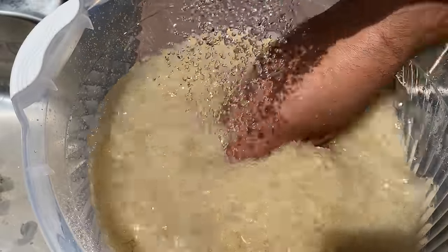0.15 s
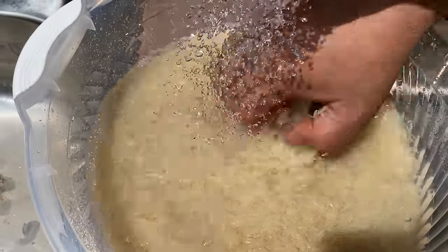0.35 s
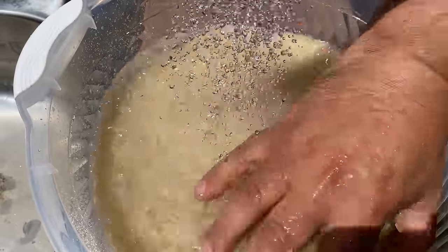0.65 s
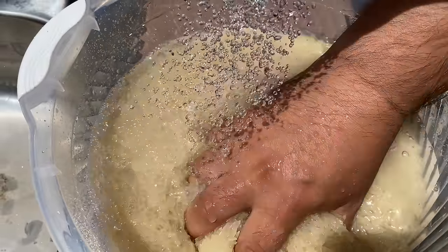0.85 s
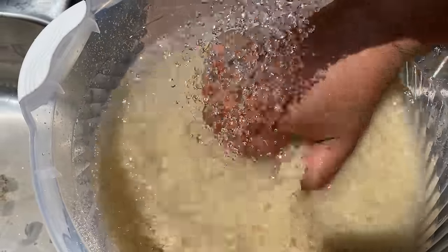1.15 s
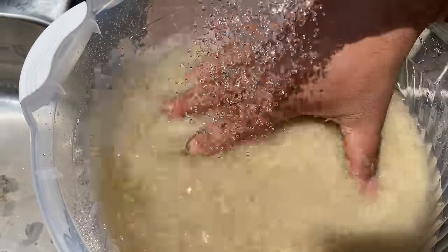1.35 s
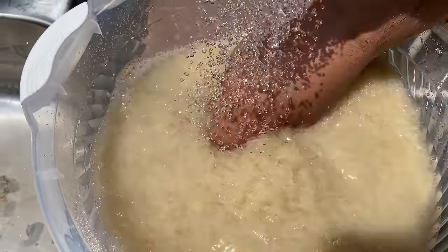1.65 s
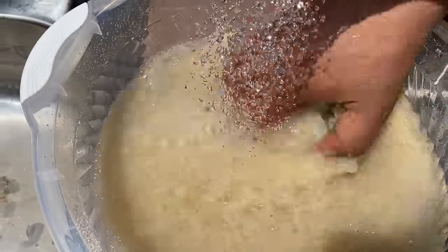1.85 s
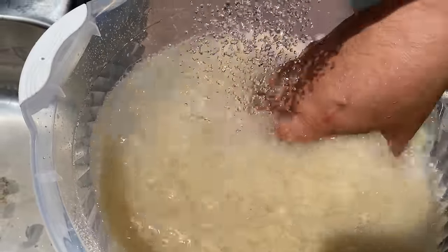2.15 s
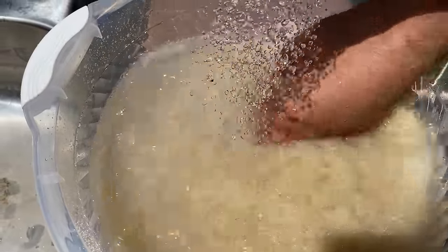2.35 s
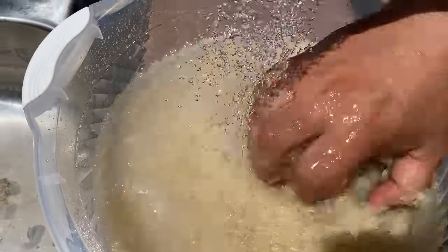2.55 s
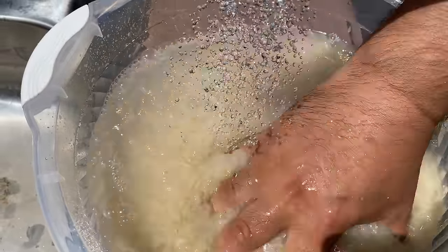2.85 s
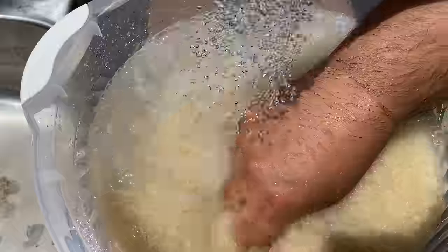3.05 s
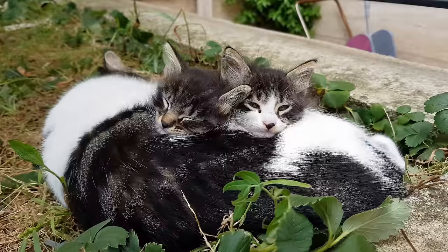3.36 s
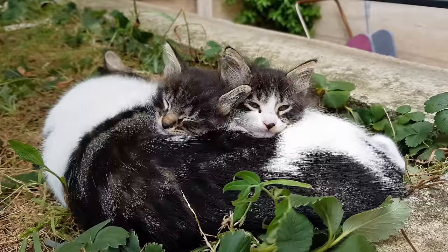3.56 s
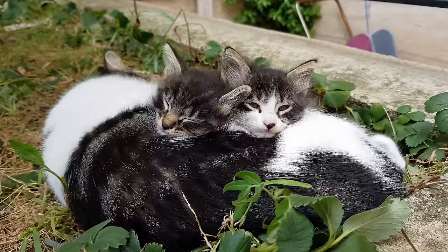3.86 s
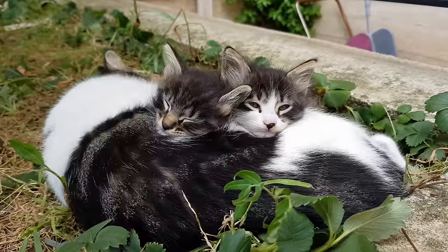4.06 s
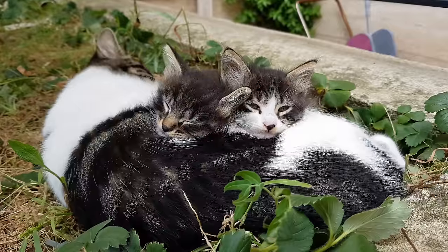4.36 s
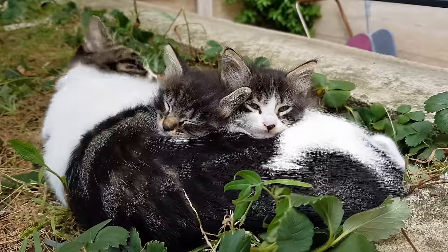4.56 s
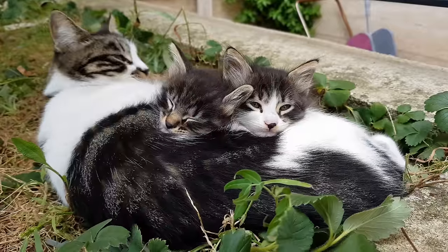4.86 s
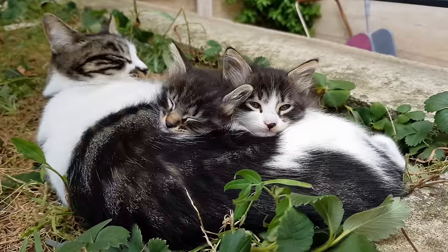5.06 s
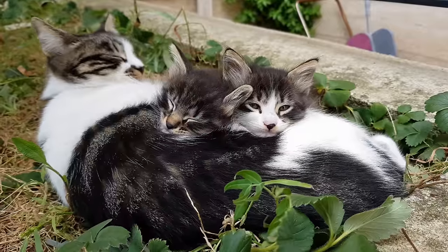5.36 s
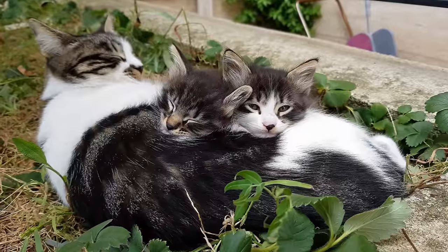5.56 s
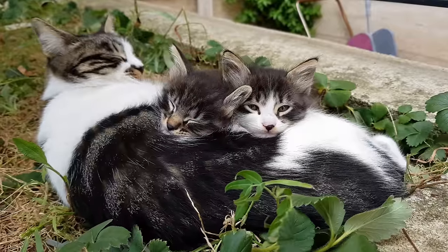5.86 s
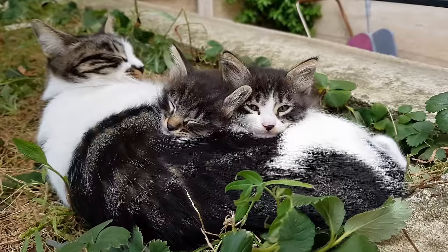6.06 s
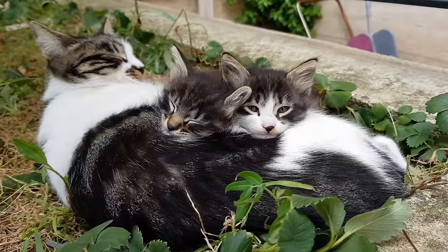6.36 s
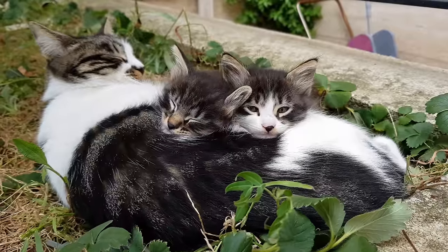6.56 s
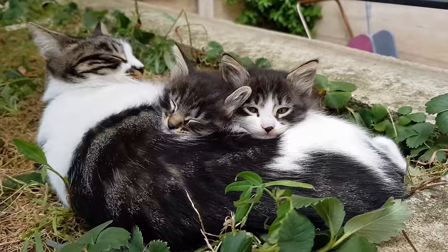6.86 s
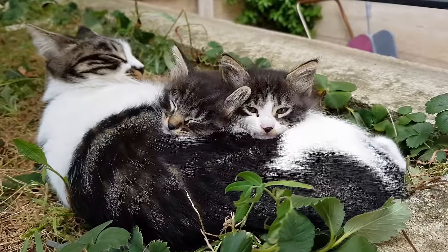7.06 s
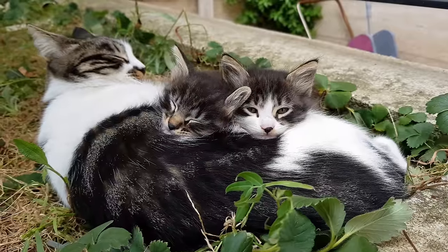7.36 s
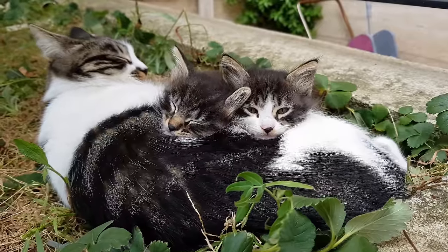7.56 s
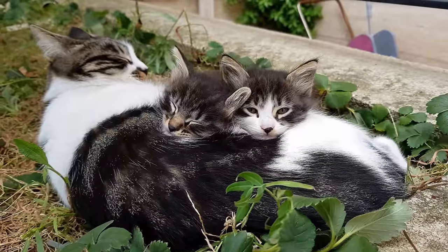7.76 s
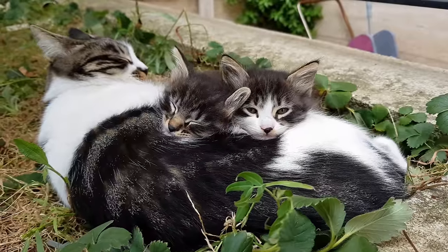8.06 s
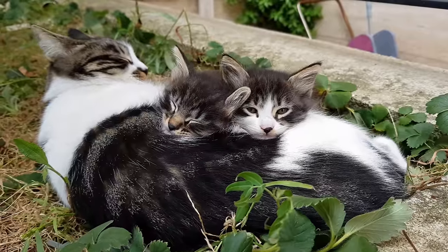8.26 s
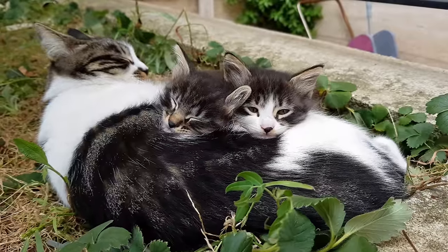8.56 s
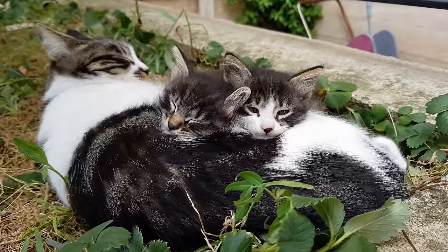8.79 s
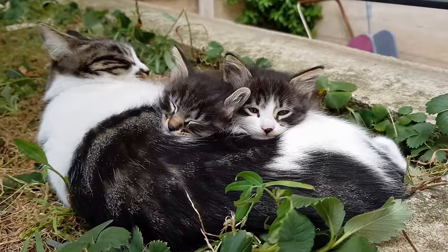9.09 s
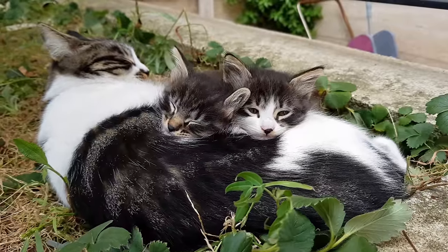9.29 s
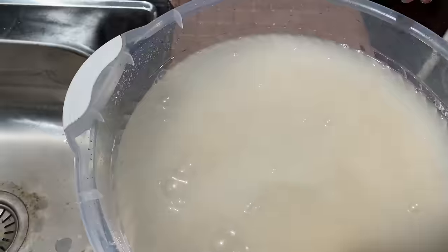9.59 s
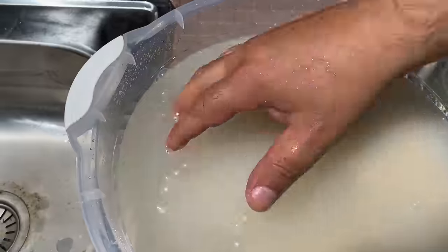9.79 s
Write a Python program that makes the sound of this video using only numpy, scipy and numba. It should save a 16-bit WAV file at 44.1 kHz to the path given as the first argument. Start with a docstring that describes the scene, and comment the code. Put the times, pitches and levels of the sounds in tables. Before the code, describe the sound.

Close, bright running water hisses, fizzes and burbles in a bowl as a hand rubs rice, then shuts off to faint wet ticks.

```python
"""Rinsing rice under a spray tap

A spray tap runs into a plastic bowl of rice and water, close up, while a hand stirs and rubs the grains.
Drops patter as clicks and ringing specks, small bubbles fizz as showers of damped sines,
and larger air pockets gurgle at a pitch that slides with each stroke of the hand.
The tap is shut near the end: a faint hiss, one drip and a few wet ticks remain over a low rumble of air."""
import sys
import numpy as np
from scipy import signal
from scipy.fft import rfft, irfft
from scipy.io import wavfile
from scipy.ndimage import uniform_filter1d
from numba import njit

SR = 44100
rng = np.random.default_rng(int(sys.argv[2]) if len(sys.argv) > 2 else 0)


def store_pcm(level_fs):
    """Save levels as 16-bit WAV."""
    pcm = np.round(np.clip(level_fs, -1, 1) * 32767).astype(np.int16)
    wavfile.write(sys.argv[1], SR, np.atleast_2d(pcm).T)


N = 437892
TIME = np.arange(N) / SR  # s

# tone of the spray: freq_hz, relative_db
SPRAY_TONE = [(400, -27.5), (800, -24), (1500, -10), (3000, 0), (4500, -0.5), (5800, 0.5), (7200, -1.5),
              (8800, 0.5), (9800, -2.5), (11000, -9), (13500, -10.5), (15800, -15)]


def spray(surge):
    """Drops slap skin and water as sharp clicks, and many trap a tiny, briefly ringing bubble."""
    s, size, sign, _ = shower(count=90000, scatter_db=6.7)
    clicks = np.bincount((s * SR).astype(int), size * np.sign(sign - .5), N)
    s, size, place, spread = shower(count=44000, scatter_db=6.0)
    hz = 3400 * 4.323 ** place
    cycles = 27 * np.exp(0.678 * spread)
    # smaller bubbles ring for less time but more strongly, so all sizes carry like energy
    fizz = ring(s, hz, cycles, size * np.sqrt(hz), rise=.05, swell=2.2)
    patter = colour(clicks, SPRAY_TONE) + undb(-1.5) * colour(fizz, SPRAY_TONE)
    return steady(patter * undb(2.0 * surge))


# typical pitch of the small bubbles, lower where the stream plunges deep: time_s, pitch_hz
CHURN_PITCH = [(0, 3200), (1.1, 2750), (2.6, 3000), (3.8, 2559), (5.3, 2439), (5.9, 3309), (6.6, 2909),
               (7.3, 2202), (8.8, 2259)]


def small_bubbles(surge):
    """Millimetre bubbles crackle where the stream and the fingers churn the rice."""
    s, size, _, spread = shower(count=40000, scatter_db=4.7)
    typical_hz = np.interp(s, *np.transpose(CHURN_PITCH))
    hz = np.minimum(typical_hz * np.exp(.35 * rng.standard_normal(len(s))), SR / 4)
    cycles = 30 * np.exp(0.74 * spread)
    crackle = ring(s, hz, cycles, size, rise=0.0328, swell=0.735)
    return steady(low_cut(crackle, 586) * undb(3.0 * surge))


POCKET_HZ = 902.5  # pitch of a pocket of ordinary size


def gurgle():
    """The air pocket under the stream rings at a gliding pitch; a large one is purer, with more overtone."""
    pitch = pocket_pitch() * np.exp(0.02 * walk(18))
    s, size, _, spread = shower(count=4200, scatter_db=4.5)
    centre = pitch[(s * SR).astype(int)]
    small = centre / POCKET_HZ  # above 1 for a small pocket
    hz = centre * np.exp(0.063 * small ** 1.2 * spread)
    cycles = np.full(len(s), 36.)
    pocket = ring(s, hz, cycles, size, rise=0.04, swell=1.2)
    overtone = ring(s, hz * 1.6, cycles * 1.74, size * undb(-18) / small ** 2, rise=0.037, swell=1.2)
    # fragments of the pocket ring near one pitch of their own
    s, size, _, spread = shower(count=4200, scatter_db=4.0)
    small = pitch[(s * SR).astype(int)] / POCKET_HZ
    hz = 975 * small ** .1 * np.exp(0.12 * spread)
    fragments = ring(s, hz, np.full(len(s), 33.), size / small ** 2.2, rise=0.028, swell=1.3)
    return steady(low_cut(pocket + overtone + undb(-1.5) * fragments, 400))


# strokes of the hand through rice and stream; levels before sag and trim, settling before its speed factor:
# start_s, length_s, settle_by_20_db_s, spray_db, churn_db, gurgle_db, first_pocket_hz, last_pocket_hz
STROKES = [(-.03, 0.304, 1.43, -28.5, -36.5, -35.5, 988, 853), (0.546, 0.31, 1, -31, -37, -37, 992.5, 939),
           (1.017, 0.44, 1.16, -35, -41, -46, 835, 1050), (1.459, 0.335, 0.01, -32.5, -47, -38, 943, 940.4),
           (1.766, 0.1414, 0.04, -30.5, -39, -36.5, 985, 902),
           (1.9, 0.552, 3.5, -30, -36.5, -34, 980, 1025), (2.59, 0.656, 0.08, -32.5, -39, -36.5, 955, 867),
           (3.347, 0.093, 0.72, -39.5, -46, -61.5, 1058, 1156),
           (3.474, 0.1183, 0.16, -33, -38.5, -36, 925, 926),
           (3.596, 0.1547, 1.11, -30.5, -37, -43, 796.4, 590.3),
           (3.834, 0.288, 2, -32, -37, -36, 931, 751.4), (4.295, 0.234, 0.29, -30, -36, -38, 978, 782),
           (4.596, 0.1963, 1.1, -29, -36.5, -40, 988, 440), (4.899, 0.169, 0.89, -33, -35.5, -36, 794, 960),
           (5.097, 0.313, 1.01, -31.5, -38, -42, 822, 505), (5.583, 0.157, 1.41, -33, -37, -41, 900, 841),
           (5.887, 0.2897, 0.19, -33, -44.5, -39.5, 1042, 660),
           (6.323, 0.328, 0.426, -31.5, -41, -42, 904.6, 427),
           (6.739, 0.235, 0.47, -37.5, -40.5, -44.5, 536.4, 819),
           (7.022, 0.133, 0.5, -35, -40, -43, 1004, 842), (7.217, 0.078, 0.3, -36.5, -39.5, -46, 771, 805),
           (7.411, 0.496, .5, -31, -35, -38.5, 870, 740),
           (7.86, 0.3904, 0.3, -32.5, -36, -37.5, 789, 511.6),
           (8.269, .55, 0.12, -32.5, -35.5, -39.5, 554, 615)]
# how each part of the water answers a stroke: attack_s, sag_db over the stroke, settling_speed factor, trim_db
SPRAY_SHAPE = (0.0245, -0.12, 1.284, -0.125)
CHURN_SHAPE = (0.0569, 0.816, 1.242, 0.45)
GURGLE_SHAPE = (0.0623, 2.06, 1.56, 1.04)


def stroke_gain(column, shape):
    """Each stroke swells, sags while the hand pushes, then settles; overlapping strokes add in power."""
    attack_s, sag_db, settling_speed, trim_db = shape
    power = np.zeros(N)
    for row in STROKES:
        start, length, settle_s = row[:3]
        first = max(int(start * SR), 0)
        age = TIME[first:first + 2 * SR] - start
        sag = sag_db * np.minimum(age / length, 1)
        settle = 20 * settling_speed * np.maximum(age - length, 0) / settle_s
        attack = np.clip(age / attack_s, 0, 1)
        power[first:first + len(age)] += (attack * undb(row[column] - sag - settle)) ** 2
    return np.sqrt(power) * undb(trim_db)


# the pitch slide begins this late and spans this share of the stroke
POCKET_LAG_S, POCKET_TURN = 0.03334, 0.92


def pocket_pitch():
    """Pockets grow as the hand pushes on, so pitch mostly falls in a stroke and recovers before the next."""
    times, pitches = [], []
    for start, length, *_, first_hz, last_hz in STROKES:
        times += [start + POCKET_LAG_S, start + POCKET_LAG_S + POCKET_TURN * length]
        pitches += [first_hz, last_hz]
    return np.exp(np.interp(TIME, np.maximum.accumulate(times), np.log(pitches)))


# fingers cut through the stream: peak_s, half_width_s, added_power_db relative to the running water
SPLASHES = [(.84, 0.0314, -2), (1.53, 0.043, -1.5), (2.19, 0.072, -2), (2.38, 0.046, -2),
            (6.055, 0.035, -1), (6.55, 0.06, -6), (7.156, 0.0053, 1.5), (7.272, 0.0058, 6),
            (7.44, 0.0115, -1)]


def splashes():
    """Gain of the splashes as fingers cut the stream, added in power to the running water."""
    return swells(SPLASHES, rest_db=0)


# the hand shields the water from the stream: deepest_s, half_width_s, dip_db
LULLS = [(0.479, 0.025, -3.5), (3.7, 0.011, -10), (4.574, 0.0094, -5), (4.115, 0.0225, -6.5),
         (1.67, .055, -3), (6.2, 0.031, -7.5)]


def lulls():
    """Gain of the running water, dipping briefly whenever the hand shields it."""
    dip_db = np.zeros(N)
    for s, width, db in LULLS:
        near = slice(*np.searchsorted(TIME, [s - 3 * width, s + 3 * width]))
        dip_db[near] += db * np.exp(-((TIME[near] - s) / width) ** 2)
    return undb(dip_db)


# how far the hand breaks the stream into separate splashes: time_s, sputter (0-1)
SPUTTER = [(0, 0.33), (1.2, 0.43), (2.1, 0.35), (5.2, 0.31), (5.8, 0.86), (7.4, 1), (7.7, 0.14), (9, 0.08)]
THINNING_DB = -10  # count of grains kept at full sputter, as 20 log10 of the share


def shower(count, scatter_db):
    """Random grains, fewer and more uneven with sputter: times, sizes, an even and a bell-shaped chance."""
    u = rng.random((count, 6))
    sputter = np.interp(u[:, 0] * N / SR, *np.transpose(SPUTTER))
    kept = u[:, 5] < undb(THINNING_DB * sputter)
    u, uneven = u[kept], 0.423 + 0.589 * sputter[kept]
    tail = np.minimum(-np.log(1 - u[:, 1]), 4.5)  # many small grains, few large, none enormous
    bell = (u[:, 3] - u[:, 4]) * np.sqrt(6)
    return u[:, 0] * N / SR, undb(scatter_db * uneven * tail), u[:, 2], bell


def stream_surge():
    """The stream breaks over the moving hand at three speeds of random surge, deeper with more sputter."""
    clumps = 0.39 * walk(55) + 0.505 * walk(190) + 0.988 * walk(700)
    return clumps * (0.708 + 0.65 * curve(SPUTTER))


# single loud bubbles: start_s, pitch_hz, level_db before make-up gain, cycles to fall 60 dB
LOUD_BUBBLES = [(.392, 1000, -24, 24), (.498, 1330, -27, 20), (.559, 5700, -14, 16), (0.56, 918, -22, 32),
                (.637, 986, -25.5, 33), (.842, 2086, -22, 39), (.89, 924, -23, 21), (.967, 4403, -15, 32.3),
                (1.096, 962.6, -21, 29.5), (1.171, 1228, -21.5, 13.3), (1.474, 4100, -13.5, 18.7),
                (1.797, 1130, -24, 18), (1.864, 765.4, -21.5, 19.8), (2.215, 1072, -22, 34),
                (2.303, 1007, -15.5, 24), (2.355, 7800, -20, 32), (2.763, 1054, -16.5, 15),
                (3.309, 1267, -27, 28), (3.422, 1237, -27.5, 15), (3.515, 957, -24.5, 30),
                (3.609, 1045, -22.5, 28.8), (3.636, 3490, -13.5, 17), (4.348, 882, -27, 34.6),
                (4.548, 841, -25, 16.5), (4.581, 838, -19, 18.6), (4.7, 4500, -16.5, 27.4),
                (4.77, 902, -21, 19.3), (5.007, 969, -24, 37.7), (5.276, 2590, -26, 30),
                (5.9, 4220, -9, 15.9), (5.948, 3940, -17, 30.7), (5.951, 1090, -29.5, 26),
                (5.982, 3042, -17, 32), (6.059, 7930, -12.5, 41), (6.075, 7200, -14, 12.3),
                (6.162, 7620, -13.5, 20.6), (6.226, 2050, -18, 12), (6.343, 4445, -22.5, 35.48),
                (6.377, 1850, -18, 21), (6.629, 2460, -15.5, 12.9), (6.843, 1457, -17.5, 17.2),
                (7.063, 980, -20.5, 30.7), (7.067, 2100, -26, 33), (7.078, 890, -26.5, 35),
                (7.152, 6400, -14.5, 18.4), (7.246, 727, -31, 24), (7.29, 1064, -28, 38),
                (7.328, 855, -23, 36.2), (7.378, 2346, -22, 16.1), (7.459, 792, -29, 29.5),
                (7.476, 1636, -19.5, 20.7), (7.532, 1660, -21.5, 24), (7.587, 780, -24, 26),
                (7.652, 870, -25, 34), (7.672, 1620, -23.5, 28), (8.6, 1080, -24, 32),
                (8.888, 2500, -30, 20)]


def loud_bubbles():
    """Single bubbles pinch off with a plip, each a damped sine that rises slightly."""
    s, hz, db, cycles = np.array(LOUD_BUBBLES, float).T.copy()
    return low_cut(ring(s, hz, cycles, undb(db + 9.5), rise=0.0416, swell=1.495), 536)


# strings of bubbles torn off by the fingers: start_s, length_s, first_pitch_hz, last_pitch_hz, rms_db before low cut
STRINGS = [(.58, 0.19, 3590, 3450, -39), (2.36, 0.055, 2420, 2504, -34), (3.758, 0.0815, 1148, 1318, -38),
           (6.385, .06, 2516, 2530, -34), (6.499, 0.101, 2455, 2750, -35.5), (6.601, 0.169, 944, 984, -46),
           (6.785, .11, 920, 995, -42), (6.938, 0.0543, 1155, 1012, -39), (7.09, .05, 1750, 1850, -37),
           (8.37, .18, 655.4, 960, -38.5)]
BUBBLES_PER_S, PITCH_SPREAD, STRING_CYCLES = 150, .05, 40.  # spread as a share of the pitch


def bubble_strings():
    """Bubbles of like size follow each other closely, merging into a short gliding burble."""
    out = np.zeros(N)
    for start, length, first_hz, last_hz, db in STRINGS:
        count = int(length * BUBBLES_PER_S) + 1
        u = rng.random((count, 3))
        along = (np.arange(count) + u[:, 0]) / count
        glide_hz = first_hz * (last_hz / first_hz) ** along
        hz = glide_hz * np.exp(PITCH_SPREAD * np.sqrt(3) * (2 * u[:, 1] - 1))
        size = np.sqrt(np.sin(np.pi * along)) * (.5 + u[:, 2])
        cycles = np.full(count, STRING_CYCLES)
        burble = ring(start + length * along, hz, cycles, size, rise=0.082, swell=1.57)
        out += burble * undb(db) / np.sqrt(burble @ burble / (length * SR))
    return low_cut(out, 554)


def drip(start=9.211, pitch_hz=1418., db=-34, linger_db=-17):
    """A last drop hits still water; its bubble rings, then lingers faintly while rising in pitch."""
    s, pitch, size = np.array([start]), np.array([pitch_hz]), undb([db])
    plink = ring(s, pitch, np.array([50.]), size, rise=.03, swell=.1)
    linger = ring(s, pitch, np.array([210.]), size * undb(linger_db), rise=.06, swell=.1)
    snap = ring(s, pitch * 1.3, np.array([9.]), size * undb(-4.5), rise=0.086, swell=0.026)
    return low_cut(plink + linger + snap, 1200)


# wet ticks and splats of the hand: start_s, peak_db, band_hz (band runs from 0.5 to 1.565 times this), t60_s
TICKS = [(8.955, -36.5, 3180, 0.035), (9.312, -37.5, 8060, 0.028), (9.584, -25.5, 6080, 0.0101),
         (9.586, -34.5, 370, 0.07), (9.705, -35.5, 1250, 0.09), (9.909, -28, 4700, 0.0066),
         (9.908, -35.5, 1290, 0.077)]


def ticks():
    """Wet crackle from the hand in the bowl: short decaying bursts of band-passed noise."""
    out = np.zeros(N)
    for s, db, hz, t60 in TICKS:
        first = int(s * SR)
        age = TIME[:min(N - first, SR // 4)]
        edges = [hz / 2, min(hz * 1.565, SR / 2 - 1000)]
        band = signal.butter(2, edges, "band", fs=SR, output="sos")
        decay = np.exp(-np.log(1000) * age / t60)
        burst = signal.sosfilt(band, rng.standard_normal(len(age)) * decay)
        out[first:first + len(age)] += undb(db) * burst / np.abs(burst).max()
    return out


def thump(start=8.81, hz=167.7, db=-47.0, cycles=129.0):
    """A soft, low damped sine as the tap is shut."""
    return ring(np.array([start]), np.array([hz]), np.array([cycles]), undb([db]), rise=0.0037, swell=3.5)


def sink(x, echo_db=-19.5):
    """Bowl and basin throw back early reflections whose paths shift with the hand and the water."""
    out = x
    for delay in np.geomspace(.0015, .016, num=5):  # s
        path = delay * np.exp(0.0805 * walk(5))
        out = out + undb(echo_db - 21.3 * delay) * np.interp(TIME - path, TIME, x)
    return out


# surges of water shifting in the bowl: peak_s, half_width_s, level_db before wandering
SWIRLS = [(.785, .05, -59), (8.83, 0.053, -49.5), (9.55, 0.03, -55), (9.605, 0.03, -52.5), (9.66, .03, -59),
          (9.8, 0.19, -58)]
# tone of the shifting water: freq_hz, relative_db
SLOSH_TONE = [(60, -6), (190, 6.5), (300, 3), (550, -2), (1000, -9), (2500, -14), (8000, -28.5),
              (15000, -31.5)]


def slosh():
    """Water shifts in the bowl: low, swelling noise."""
    surges = swells(SWIRLS, rest_db=-63)
    return colour(rng.standard_normal(N), SLOSH_TONE) * surges * undb(3.11 * walk(18))


def trickle():
    """Water left in the bowl keeps trickling faintly, as unsteady noise."""
    tone = [(300, -20.5), (700, -2.0), (2500, -9.5), (6000, -12.5)]  # freq_hz, relative_db
    return colour(rng.standard_normal(N), tone) * undb(-68 + 3.6 * walk(22))


# gusts of air at the microphone: peak_s, half_width_s, level_db before wandering
GUSTS = [(2.53, 0.093, -41.5), (3.9, 1, -47), (4.95, 0.136, -38), (5.75, 0.166, -37), (6.4, 0.31, -42),
         (7.14, 0.114, -33.5), (8.17, 0.205, -33.5), (9.2, 0.7, -40.5)]
# tone of the air: freq_hz, relative_db
AIR_TONE = [(15, 11), (30, 4), (55, -4.5), (100, -8), (180, -32), (900, -55.5)]


def air():
    """Air rumbles on the microphone; strong gusts break into smaller eddies, which flutter higher."""
    gust = swells(GUSTS, rest_db=-51) * undb(1.04 * walk(9.9))
    rumble = colour(rng.standard_normal(N), AIR_TONE) * gust
    eddy_tone = [(50, -3.5), (115, -5.5), (400, -42.0), (2000, -66.5)]  # freq_hz, relative_db
    eddies = colour(rng.standard_normal(N), eddy_tone) * gust ** 2 * undb(23.5)
    return rumble + eddies


# tone of the faint hiss: freq_hz, relative_db
HISS_TONE = [(60, -0.5), (110, -0.5), (200, -9.5), (550, -15.5), (750, -41.5), (2300, -25), (4000, -9.5),
             (5700, -6.5), (8700, -7.5), (11000, -17.5), (15000, -36.5)]


def hiss():
    """A faint, slightly wavering hiss lies under it all and drops 7 dB near the end."""
    level_db = -55.5 - np.interp(TIME, (9.5, 9.56), [0, 7])
    return colour(rng.standard_normal(N), HISS_TONE) * undb(level_db + 0.75 * walk(25))


@njit
def ring(start, hz, cycles, size, rise, swell):
    """Damped sines: each swells in about `swell` cycles, dies by 60 dB in `cycles`, rises by the share `rise`."""
    out = np.zeros(N)
    for k in range(len(start)):
        first, length = int(start[k] * SR), cycles[k] * SR / hz[k]
        step = 2 * np.pi * hz[k] / SR
        # a rotating number: `turn` spins and shrinks it, `glide` quickens the spin
        turn, glide = np.exp(1j * step - np.log(1000) / length), np.exp(1j * step * rise / length)
        z, shut, opening = size[k] + 0j, 1., np.exp(-hz[k] / SR / swell)
        for i in range(max(0, min(int(length), N - first))):
            out[first + i] += z.imag * (1 - shut)
            z, turn, shut = z * turn, turn * glide, shut * opening + 1e-18
    return out


def undb(db):
    """Decibels to gain."""
    return 10 ** (np.asarray(db) / 20)


def curve(table, axis=1):
    """One column of a table, joined by straight lines in time."""
    rows = np.array(table)
    return np.interp(TIME, rows[:, 0], rows[:, axis])


def colour(x, points):
    """Shape a sound by a spectrum; rms 1."""
    hz, db = np.transpose(points)
    f = np.arange(N // 2 + 1) * SR / N
    gain = undb(np.interp(np.log(f + 1), np.log(hz), db))
    y = irfft(rfft(x) * gain, N)
    return y / y.std()


def steady(x, span_s=0.0834):
    """Hold the running rms near 1, leaving the quick grain alone."""
    size = int(span_s * SR)
    power = uniform_filter1d(uniform_filter1d(x ** 2, size), size // 2)
    return x / np.sqrt(np.abs(power) + 1e-12)


def walk(rate):
    """Smooth random wandering with a spread near 1, through `rate` random points a second."""
    knots = rng.standard_normal(4096)
    return np.interp(TIME * rate, np.arange(len(knots)), knots) * np.sqrt(3 / 2)


def low_cut(x, hz):
    """Steep high-pass: small bubbles radiate no bass."""
    return signal.sosfilt(signal.butter(4, hz, "high", fs=SR, output="sos"), x)


def swells(table, rest_db):
    """Gain of bell-shaped swells, added in power to a resting level."""
    power = np.full(N, undb(rest_db) ** 2)
    for s, width, db in table:
        near = slice(*np.searchsorted(TIME, [s - 3 * width, s + 3 * width]))
        power[near] += undb(db) ** 2 * np.exp(-((TIME[near] - s) / width) ** 2)
    return np.sqrt(power)


def patchy(x, depth_db, rate):
    """Let each band of a sound swell and fade on its own."""
    out, rest = np.zeros(N), x
    for edge in 1500 * np.sqrt(2) ** np.arange(7):  # Hz, half an octave apart
        band = signal.sosfiltfilt(signal.butter(3, edge, fs=SR, output="sos"), rest)
        out, rest = out + band * undb(depth_db * walk(rate)), rest - band
    return out + rest * undb(depth_db * walk(rate))


def scene():
    """Strokes drive spray, churn and gurgle; single bubbles and drips join them in the sink, over the background."""
    surge, wobble, splash = stream_surge(), walk(20), splashes()
    spray_gain = stroke_gain(column=3, shape=SPRAY_SHAPE) * splash * undb(0.384 * wobble)
    # small bubbles answer a splash more strongly than the spray
    churn_gain = stroke_gain(column=4, shape=CHURN_SHAPE) * splash ** 1.875 * undb(0.86 * wobble)
    water = spray(surge) * spray_gain + small_bubbles(surge) * churn_gain
    water = patchy(water, depth_db=1.1338, rate=45)
    # air goes under in uneven gulps
    gulps = undb(2 * (.5 + curve(SPUTTER)) * walk(20))
    water += gurgle() * stroke_gain(column=5, shape=GURGLE_SHAPE) * gulps
    in_sink = water * lulls() + bubble_strings() + loud_bubbles() + drip() + ticks()
    background = slosh() + trickle() + air() + hiss()
    return (sink(in_sink) + thump() + background)[None]


def record(dry):
    """The recorder cuts the top with a steep low-pass at 15.8 kHz."""
    return signal.sosfilt(signal.ellip(10, .2, 70, 15800, fs=SR, output="sos"), dry)


dry = scene()
out = record(dry)
store_pcm(out)
```